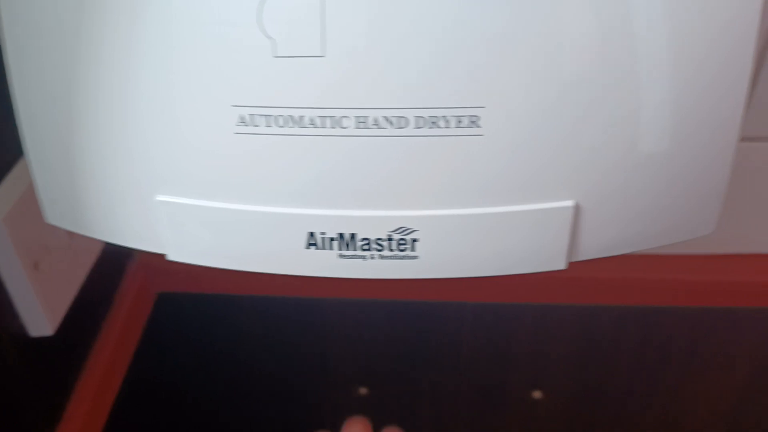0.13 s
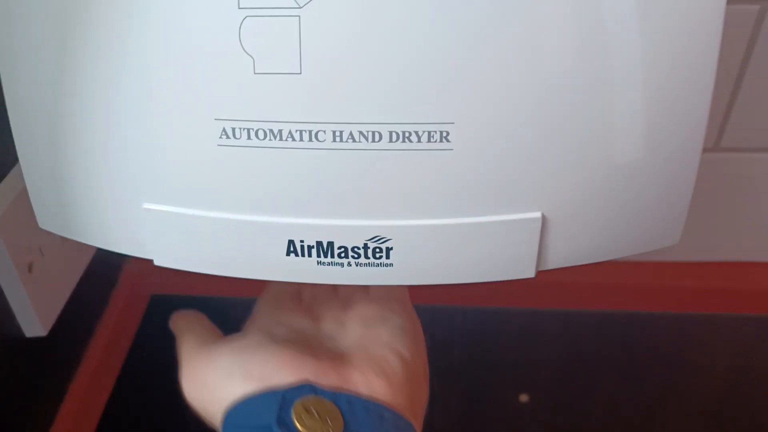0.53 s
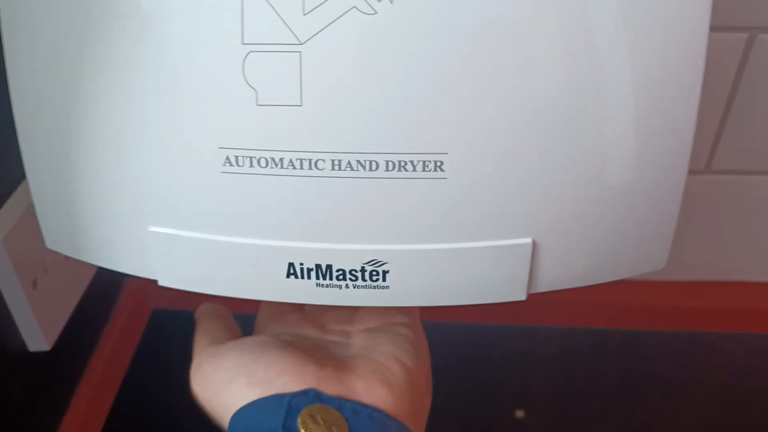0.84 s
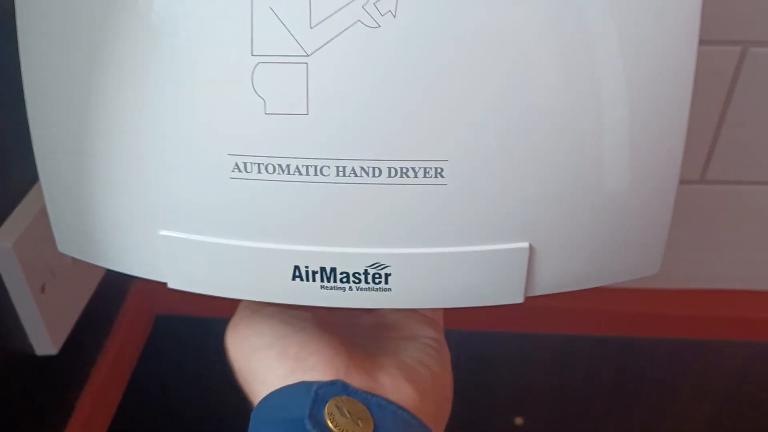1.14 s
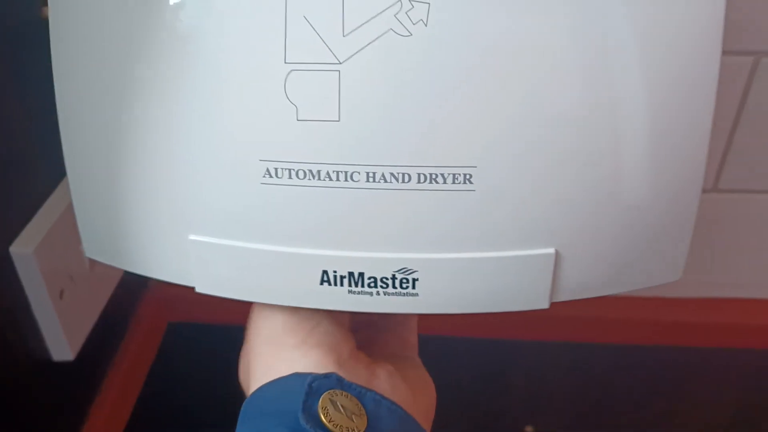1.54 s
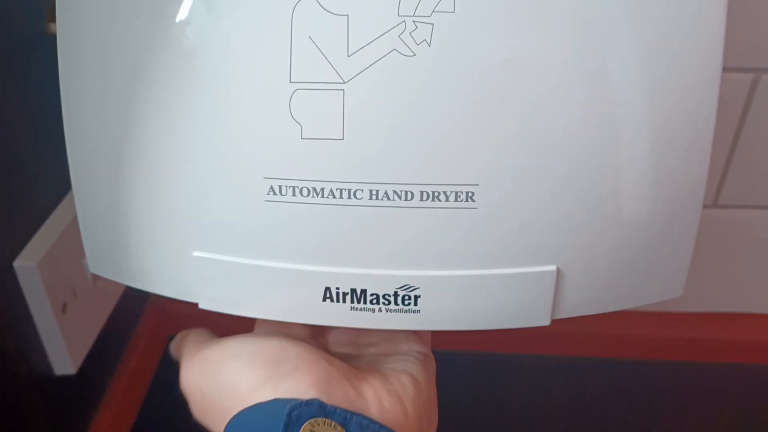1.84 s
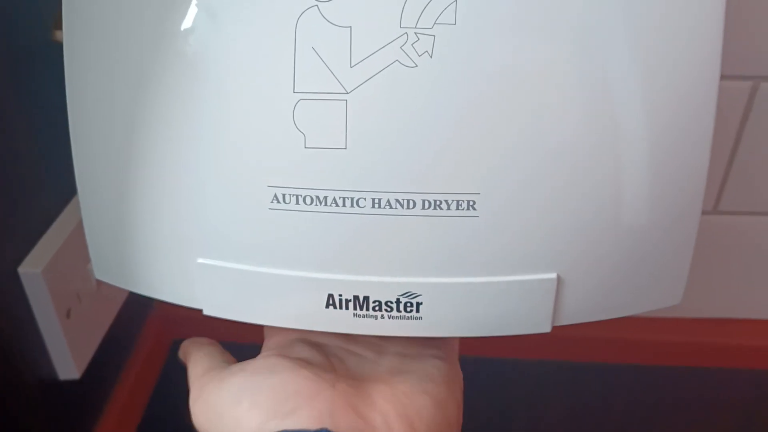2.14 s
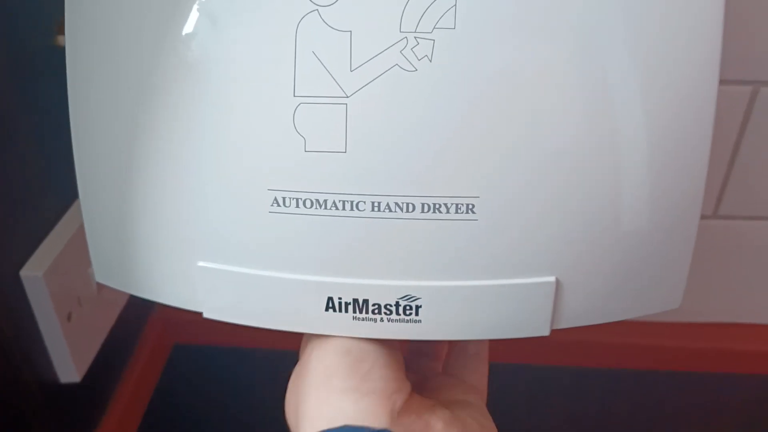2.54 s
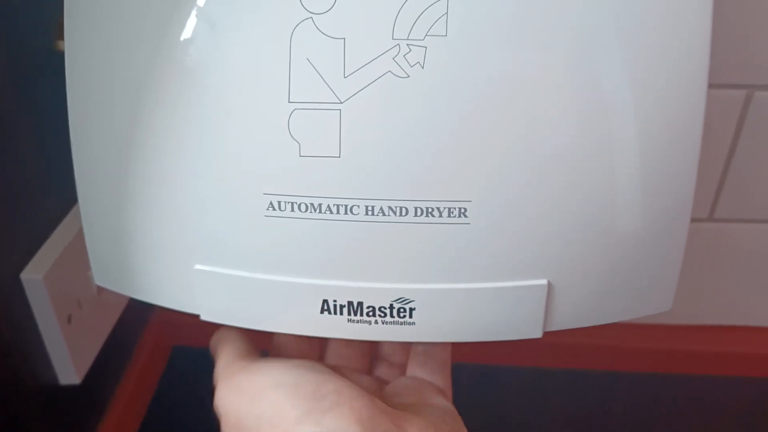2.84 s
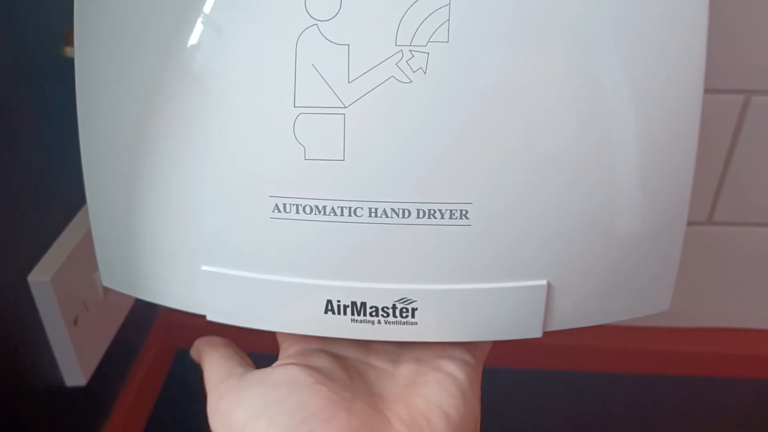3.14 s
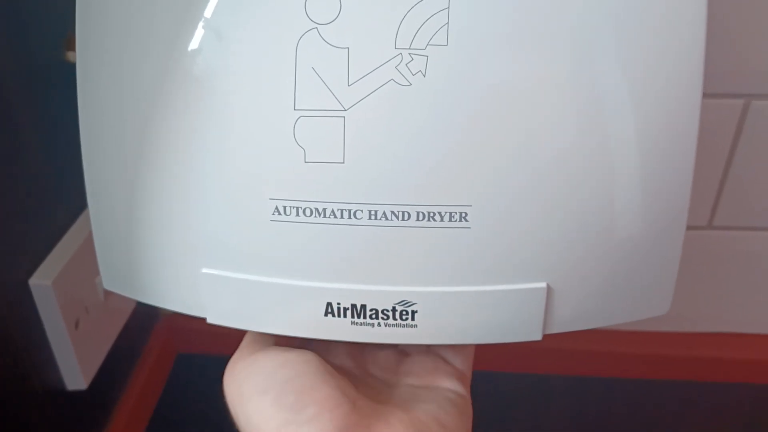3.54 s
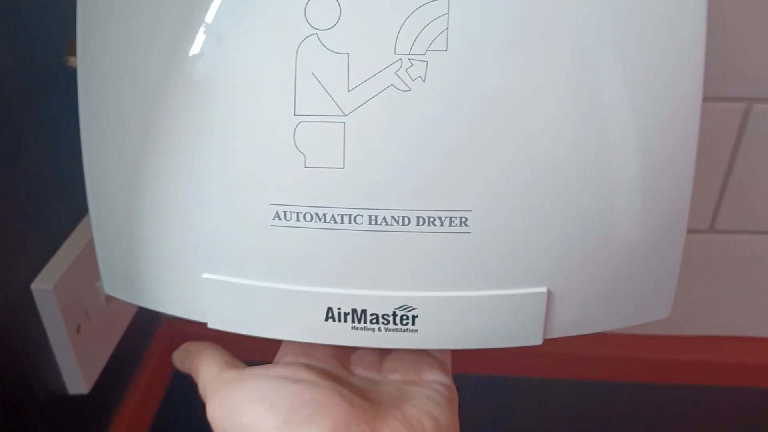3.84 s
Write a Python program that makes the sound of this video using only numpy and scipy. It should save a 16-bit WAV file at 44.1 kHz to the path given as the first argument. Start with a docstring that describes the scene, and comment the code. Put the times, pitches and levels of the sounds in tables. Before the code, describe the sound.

A hand dryer runs close by in a tiled washroom. A soft hiss comes first, then a sharp clack and motor hum at about 0.35 seconds. The fan runs up until about 1.2 seconds, and air rushes over a hand with a low drone and faint whine until the end at 4 seconds. Thin metallic scrapes ring between 2 and 3.6 seconds, loudest near 2.2.

```python
"""Wall-mounted hand dryer in a tiled washroom, heard from close by.
A soft hiss comes first. Near 0.35 s the motor starts to hum and a relay clacks; from 0.4 s the fan runs up.
The hiss sinks away; air booms in the casing and rushes over a hand until the end.
From 2 s thin metal sings now and then, as if the fan wheel grazed its housing."""
import sys
import numpy as np
from scipy import signal
from scipy.fft import rfft, irfft
from scipy.io import wavfile
from scipy.ndimage import uniform_filter1d

SR = 44100
rng = np.random.default_rng(int(sys.argv[2]) if len(sys.argv) > 2 else 0)


def master(y):
    """Save y as 16-bit WAV."""
    cut = np.clip(np.atleast_2d(y).T, -1, 1)
    pcm = np.round(cut * 32767)  # scale
    wavfile.write(sys.argv[1], SR, pcm.astype(np.int16))


N = 176400
TIME, FREQ = np.arange(N) / SR, np.fft.rfftfreq(N, 1 / SR)
MOTOR_ON_S, FAN_START_S, RUN_UP_S = 0.338, 0.4, 0.42

# Stereo tilt of hiss, rush and scrape: freq_hz, left_minus_right_db
NOISE_BALANCE = [(300, -2.5), (800, 1.5), (1200, -2.5), (2000, 0), (2900, -6.5), (4000, -10), (5500, -4),
                 (7500, -2.5), (10000, -1), (14000, 2.5)]


def amp(db):
    """Decibels to gain."""
    return 10 ** (np.asarray(db) / 20)


def unit(x):
    """Scale to rms 1."""
    return x / np.sqrt(np.mean(x ** 2) + 1e-20)


def at_freq(points, hz):
    """Interpolate a table on a log-frequency axis."""
    freq_hz, value = np.transpose(points)
    return np.interp(np.log(hz + 1), np.log(freq_hz + 1), value)


def envelope(points):
    """Gain per sample from rows of time_s, level_db."""
    return amp(np.interp(TIME, *np.transpose(points)))


def pan(balance_db):
    """Left and right gains for a level difference."""
    gains = np.array([amp(balance_db / 2), amp(-balance_db / 2)]).reshape(2, -1)
    return gains / np.sqrt(np.mean(gains ** 2, 0))


def drift(rate_hz):
    """Smooth random motion up to about rate_hz, rms 1."""
    return unit(irfft(rfft(rng.standard_normal(N)) * np.exp(-(FREQ / rate_hz) ** 2), N))


def peak(hz, width_hz):
    """Power response of a resonance; equal energy at any width."""
    return 1 / (1 + (2 * (FREQ - hz) / width_hz) ** 2) ** 1.5 / width_hz


def noise(gain):
    """Stereo noise of a given spectrum, rms 1: coherent bass, diffuse treble."""
    # Left-right likeness: freq_hz, correlation
    likeness = [(60, 0.83), (130, 0.94), (220, 0.95), (380, 0.79), (500, 0.29), (680, 0.41), (820, 0.024),
                (950, .3), (1100, 0.37), (1400, -0.62), (1750, 0.091), (2100, 0.34), (2700, -0.06),
                (4000, -.15), (6000, -0.063), (15000, 0.057)]
    left, other = rfft(rng.standard_normal((2, N)))
    correlation = at_freq(likeness, FREQ)
    right = correlation * left + np.sqrt(1 - correlation ** 2) * other
    return unit(irfft(np.array([left, right]) * gain, N))


def steadied(x, amount=0.23, window_s=0.036):
    """Even out part of the slow random level swings; rms 1."""
    power = abs(uniform_filter1d((x ** 2).mean(0), int(window_s * SR) + 1)) + 1e-9
    return unit(x / power ** (amount / 2))


def speed(time_s):
    """Fan speed as a share of full speed."""
    return 1 - np.exp(-(np.maximum(time_s - FAN_START_S, 1e-3) / RUN_UP_S) ** 2)


def fan_tone(hz, width_hz):
    """Wavering tone that rises to hz as the fan runs up."""
    phase = 2 * np.pi * np.cumsum(hz * speed(TIME) ** 0.3) / SR
    tone = (drift(width_hz) + 1j * drift(width_hz)) * np.exp(1j * phase)
    return np.array([tone.real, (tone * np.exp(0.6j)).real])


def room(x):
    """Dense reflections from the tiles, each band dying at its own rate."""
    # Washroom decay: freq_hz, t60_s
    decay_times = [(200, 0.7), (1000, 0.31), (4000, 0.63), (14000, 0.43)]
    hz, t, bands = signal.stft(rng.standard_normal((2, SR)), SR, nperseg=256)
    decay = amp(-60 * t / at_freq(decay_times, hz)[:, None])
    tail = signal.istft(bands * decay * np.minimum(t / 0.013, 1), SR, nperseg=256)[1]
    return signal.fftconvolve(x, tail / np.linalg.norm(tail[0]), axes=1)[:, :N]


def hiss(start_s=0.075, rise_s=0.0022):
    """Soft hiss that sinks away as the dryer starts."""
    # Hiss colour: freq_hz, density_db
    spectrum = [(35, -46), (60, -8), (156, -8.5), (196, 1), (343, -5), (599, -8.5), (673, -21), (773, -7),
                (1020, -13.5), (1350, -9.5), (1480, -12.5), (4420, -7), (15500, -18)]
    # Hiss loudness: time_s, level_db
    levels = [(.077, -39.5), (.14, -38.5), (.22, -39), (.34, -41.5), (.48, -40), (.53, -46), (.66, -51.5),
              (.72, -64), (.9, -78)]
    air = noise(amp(at_freq(spectrum, FREQ)) * pan(at_freq(NOISE_BALANCE, FREQ)))
    return air * envelope(levels) * np.clip((TIME - start_s) / rise_s, 0, 1)


def motor_hum(pitch_hz=253.5, level_db=-45, rise_s=0.022, fade_s=1):
    """The motor hums while it strains to start."""
    age_s = np.maximum(TIME - MOTOR_ON_S, 0)
    gain = amp(level_db) * np.minimum(age_s / rise_s, 1) * np.exp(-age_s / fade_s)
    return gain * (1 + 0.25 * drift(7.8)) * np.sin(2 * np.pi * pitch_hz * TIME)


def fan():
    """The wheel's broad whirr comes first; its narrow tones settle in near full speed."""
    # Whirr at full speed: pitch_hz, width_hz, level_db
    whirr_bands = [(1070, 70, -50), (1270, 90, -52)]
    # Tones at full speed: pitch_hz, width_hz, level_db, left_minus_right_db
    narrow_tones = [(586, 5, -55, 0), (782, 5, -48, 3), (883, 3, -51, 6), (1055, 35, -47, 0),
                    (1180, 6, -50, -7), (1225, 40, -50, -7), (1360, 25, -52, 4), (1637, 6, -56, -4),
                    (2315, 20, -54, -3), (2611, 5, -58, -7)]
    whirr = sum(amp(db) * fan_tone(hz, width_hz) for hz, width_hz, db in whirr_bands)
    tones = sum(amp(db) * pan(balance_db) * fan_tone(hz, width_hz)
                for hz, width_hz, db, balance_db in narrow_tones)
    return whirr * speed(TIME) ** 0.9 + tones * speed(TIME) ** 2


def relay(ring_db=-29, crack_db=-24, crack_t60_s=0.037, room_db=-1):
    """Contacts snap shut and bounce; each hit cracks and rings the casing, and the room answers."""
    # Contact hits: start_s, level_db
    hits = [(.3585, -3.5), (.3608, -9), (0.3635, 2.5), (.3657, -13)]
    # Casing modes: pitch_hz, level_db, t60_s
    modes = [(660, -10, .09), (770, -3, .06), (820, -2, .06), (880, -5, .08), (1965, -13, .12),
             (2030, -9, .15), (2105, -1, .06), (2150, -8, .15)]
    # Crack colour: freq_hz, density_db
    crack_spectrum = [(300, -21), (800, -1), (1600, 3), (2200, 6), (2700, -3.5), (5200, -2.5), (8000, -23),
                      (11000, -8), (14500, -3.5), (16000, -13)]

    def decay(t60_s):
        """Decays of all hits, summed in power."""
        return np.sqrt(sum((TIME > start_s) * amp(db - 60 * np.maximum(TIME - start_s, 0) / t60_s) ** 2
                           for start_s, db in hits))

    ring = np.zeros((2, N))
    for hz, db, t60_s in modes:
        cycles = hz * TIME + rng.random() + rng.random((2, 1)) / 4
        ring += amp(db) * decay(t60_s) * np.sin(2 * np.pi * cycles)
    crack = decay(crack_t60_s) * noise(amp(at_freq(crack_spectrum, FREQ)))
    clack = amp(ring_db) * ring + amp(crack_db) * crack
    return clack + amp(room_db) * room(clack)


def metal_grazes(rise_s=0.016, release_t60_s=0.5, focus_width_hz=310, scrape_db=-7, room_db=-2):
    """Gritty rubbing drives the modes of thin metal; firmer contact sings more."""
    # Metal modes: pitch_hz, width_hz, level_db, left_minus_right_db
    modes = [(1637, 8, -14, -6), (2611, 6, -1, -8), (3590, 40, 1, -9), (3680, 160, -2, -9),
             (3932, 30, -7, -8), (4785, 90, -5, -7), (6210, 60, -8, -5), (6682, 10, -8, -7),
             (6972, 20, -3, -9), (7241, 18, -8, -6), (7560, 90, -12, -5), (8368, 40, -17, -1),
             (8630, 45, -16, -4), (10300, 80, -14, -2), (10480, 100, -14, -2), (10767, 25, -11, -3),
             (12090, 60, -14, 0), (12435, 80, -15, 1), (12931, 35, -11, 1), (14018, 50, -12, 3),
             (14912, 50, -19, 3), (15606, 80, -20, 3)]
    # Rubbing contacts: start_s, length_s, level_db, tilt_db_per_octave, firmness, focus_hz, focus_db
    contacts = [(2.023, 0.13, -36, -1.5, 0.43, 3630, 5), (2.143, 0.13, -25.5, 0.3, 0.87, 3600, 1),
                (2.608, 0.1, -37.5, -0.5, 0.37, 10300, 1), (2.978, 0.041, -38, 2, 0.4, 6300, 11),
                (3.46, 0.042, -52, 10, 0.47, 12100, 10), (3.588, 0.045, -35, -1.5, 0.6, 12100, 11)]
    # Scrape colour: freq_hz, density_db
    scrape_spectrum = [(1200, -15), (2500, 10), (3800, 6), (5500, 3), (7200, -10), (9000, -8), (10500, -4),
                       (13000, -35), (15800, -48)]
    # Pings as the metal is touched: start_s, pitch_hz, level_db, t60_s
    pings = [(2.619, 2340, -33, 0.33), (2.624, 4170, -40.5, 0.47), (2.63, 15380, -49, .3)]
    response = np.sqrt(sum(amp(db) ** 2 * pan(balance_db) ** 2 * peak(hz, width_hz)
                           for hz, width_hz, db, balance_db in modes))
    metal = np.zeros((2, N))
    for start_s, length_s, db, tilt_db, firmness, focus_hz, focus_db in contacts:
        focus = np.exp(-((FREQ - focus_hz) / focus_width_hz) ** 2)
        colour = amp(tilt_db * np.log2(1 + FREQ / 1000) + focus_db * focus)
        ring = steadied(noise(response * colour))
        scrape = noise(amp(at_freq(scrape_spectrum, FREQ)) * colour * pan(at_freq(NOISE_BALANCE, FREQ)))
        attack = np.clip((TIME - start_s) / rise_s, 0, 1)
        release = amp(-60 * np.maximum(TIME - start_s - length_s, 0) / release_t60_s)
        metal += amp(db) * attack * release * unit(firmness * ring + amp(scrape_db) * scrape)
    for start_s, hz, db, t60_s in pings:
        age_s = np.maximum(TIME - start_s, 0)
        gain = np.minimum(age_s / 0.0068, 1) * amp(db - 60 * age_s / t60_s)
        metal += gain * np.sin(2 * np.pi * (hz * age_s + rng.random((2, 1)) / 4))
    metal *= unit(1 + 0.23 * drift(150))  # grit
    return metal + amp(room_db) * room(metal)


def air_rush(level_db=-32, low_cut_hz=436, flutter_db=1.45, swell_db=0.58):
    """The jet grows louder and brighter with fan speed and flutters in patches."""
    # Jet colour: freq_hz, density_db
    spectrum = [(260, -14), (450, -4), (597, -6), (663, -9), (781, -2), (920, -5.5), (1050, -3), (1120, -4),
                (1200, -1.5), (1300, -7.5), (1570, -3.5), (1800, -12.5), (2050, -6), (2650, -8.5),
                (3410, -10), (3780, -6), (4870, -13), (7280, -20), (8450, -28), (13200, -29), (15800, -35)]
    colour = amp(at_freq(spectrum, FREQ)) / np.sqrt(1 + (low_cut_hz / (FREQ + 1)) ** 8)
    hz, t, bands = signal.stft(noise(colour * pan(at_freq(NOISE_BALANCE, FREQ))), SR, nperseg=512)
    flutter = uniform_filter1d(rng.standard_normal((len(t), len(hz))), size=14, axis=0)
    patches = unit(uniform_filter1d(flutter, size=4, axis=1)).T
    speed_exponent = 2.05 + 0.49 * np.log2(1 + hz / 1000)[:, None]
    bands = bands * speed(t) ** speed_exponent * amp(flutter_db * patches)
    air = signal.istft(bands, SR, nperseg=512)[1][:, :N]
    return air * amp(level_db - swell_db * drift(15))


def casing_boom():
    """Turbulence at the outlet drives the casing's low air resonances; the main one drones."""
    # Air resonances of casing and outlet: pitch_hz, width_hz, level_db
    modes = [(170.7, 13, -10), (229.2, 50, -9), (259.5, 20, -5), (287.4, 37, -7), (324.5, 10, -16),
             (366.7, 29.5, -9), (400, 22, -12.5)]
    # Broad turbulence bed: freq_hz, density_db
    bed_spectrum = [(25, -60), (36, -42), (48, -25), (58, -26), (80, -20.5), (130, -9.5), (220, -6.5),
                    (330, -1), (480, -13), (800, -22.5), (2000, -72)]
    # Irregular swells and dips in the boom's loudness: time_s, level_db
    boom_levels = [(0.4, -30), (0.46, -48), (0.57, -36.5), (0.76, -42), (1.04, -26.5), (1.15, -29.5),
                   (1.18, -21), (1.21, -19.5), (1.3, -29), (1.33, -25), (1.48, -28.5), (1.6, -25),
                   (1.66, -29), (1.77, -24), (1.81, -29), (2.03, -25.5), (2.09, -33.5), (2.28, -27),
                   (2.69, -32), (2.73, -25.5), (2.8, -30), (2.85, -22), (2.93, -32.5), (2.96, -23.5),
                   (2.98, -30), (3.09, -27), (3.37, -29.5), (3.43, -25), (3.58, -27), (3.7, -25.5),
                   (3.79, -30.5), (4.0, -25.5)]
    # Swings of the deepest resonance: time_s, level_db
    rumble_levels = [(0.4, -65), (0.45, -57), (0.64, -54), (0.67, -59.5), (0.97, -41), (1.13, -56),
                     (1.17, -41.5), (1.48, -47), (1.54, -37.5), (1.67, -50.5), (2.21, -46), (2.38, -51.5),
                     (2.55, -47), (2.64, -56), (2.68, -45), (3.37, -54.5), (3.83, -40), (4.0, -59)]
    drone_hz, waver_hz, waver_rate_hz = 244, 5.28, 15.1
    bed_db, drone_db, boom_db, rumble_db = -5.5, -2.5, -2, 1.5
    resonances = noise(np.sqrt(sum(amp(db) ** 2 * peak(hz, width_hz) for hz, width_hz, db in modes)))
    body = steadied(resonances + amp(bed_db) * noise(amp(at_freq(bed_spectrum, FREQ))))
    phase = 2 * np.pi * np.cumsum(drone_hz + waver_hz * drift(waver_rate_hz)) / SR
    drone = unit((1 + 0.25 * drift(waver_rate_hz)) * np.sin(phase))
    boom = (body + amp(drone_db) * drone) * envelope(boom_levels)
    rumble = steadied(noise(np.sqrt(peak(hz=102, width_hz=18)))) * envelope(rumble_levels)
    onset = np.clip((TIME - MOTOR_ON_S) / 0.13, 0, 1)
    return (amp(boom_db) * boom + amp(rumble_db) * rumble) * onset


def scene():
    """Stereo sum of all sources."""
    return hiss() + relay() + motor_hum() + casing_boom() + air_rush() + fan() + metal_grazes()


def record(dry):
    """Low cut and band limit."""
    low_cut_hz, high_cut_hz = 41, 15850
    cut = signal.sosfilt(signal.butter(4, low_cut_hz, "high", fs=SR, output="sos"), dry)
    lowpass = signal.firwin(511, high_cut_hz, window=("kaiser", 9), fs=SR)
    return signal.oaconvolve(cut, lowpass[None], "same")


dry = scene()
out = record(dry)
master(out)
```